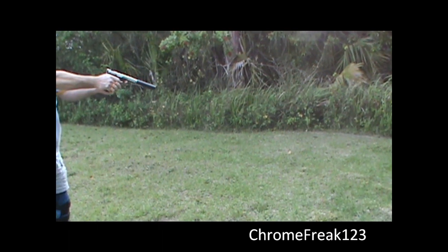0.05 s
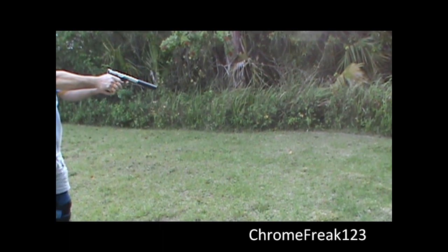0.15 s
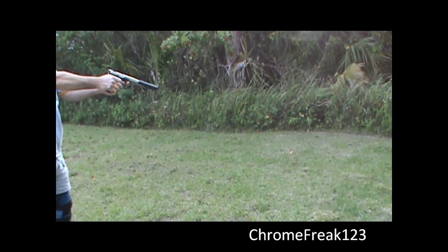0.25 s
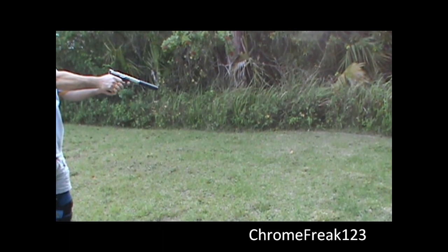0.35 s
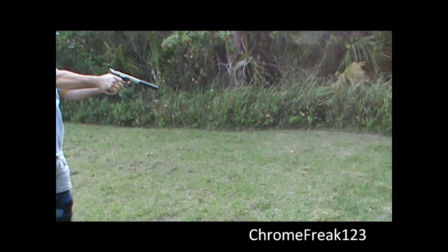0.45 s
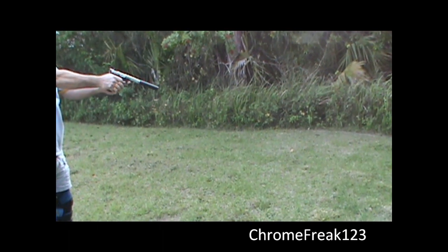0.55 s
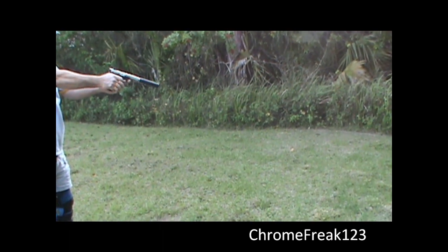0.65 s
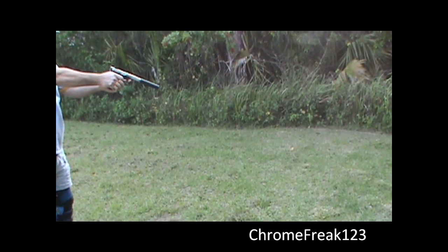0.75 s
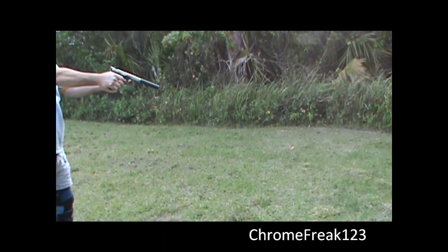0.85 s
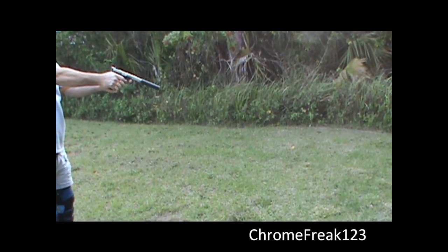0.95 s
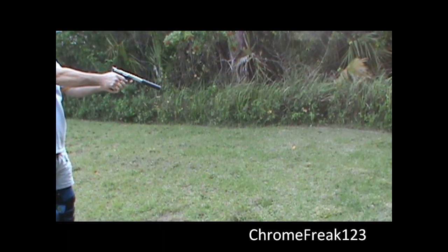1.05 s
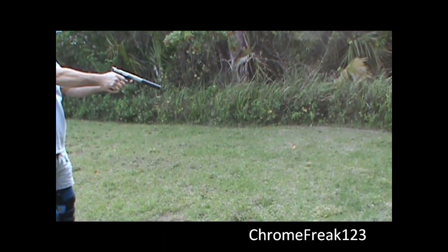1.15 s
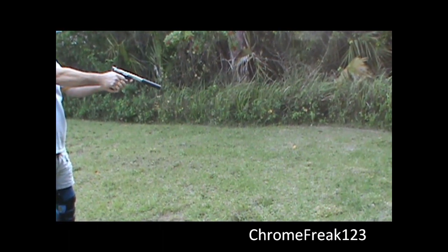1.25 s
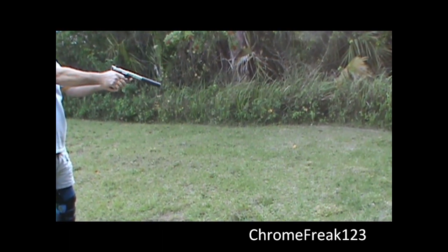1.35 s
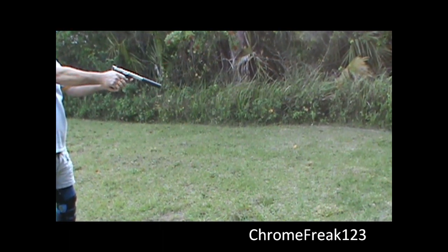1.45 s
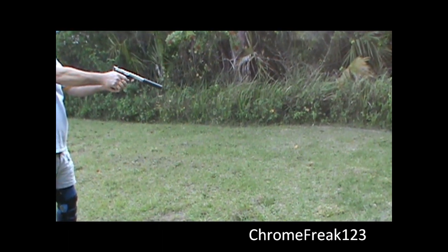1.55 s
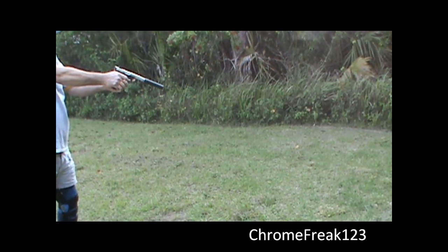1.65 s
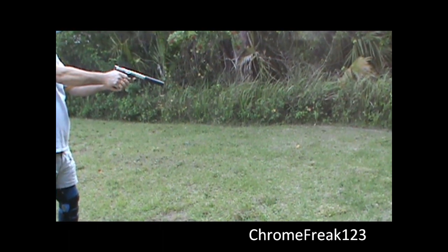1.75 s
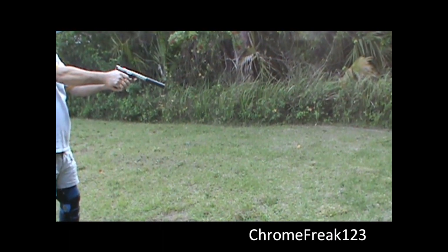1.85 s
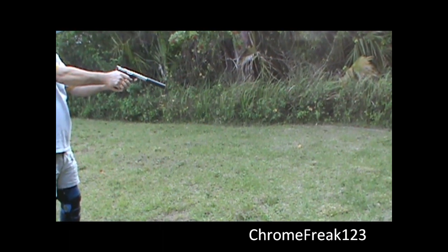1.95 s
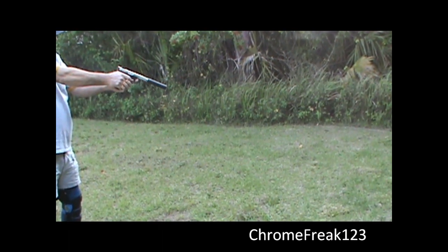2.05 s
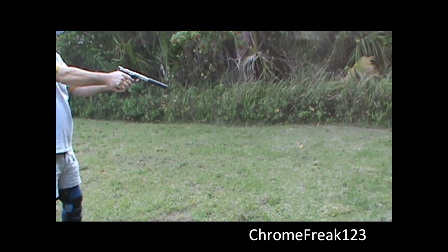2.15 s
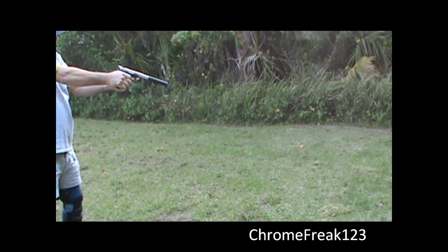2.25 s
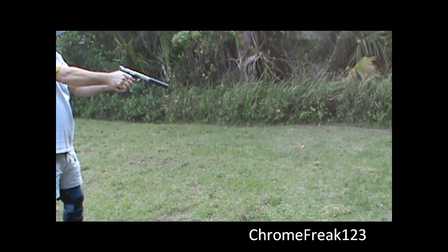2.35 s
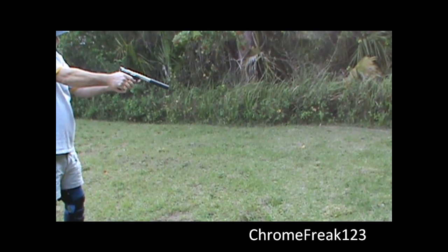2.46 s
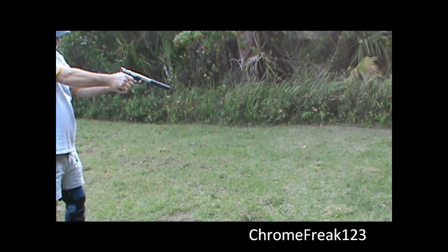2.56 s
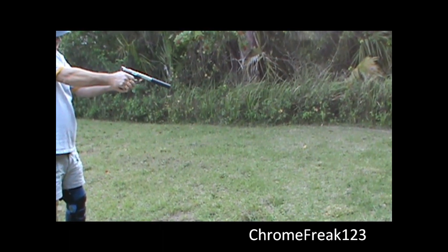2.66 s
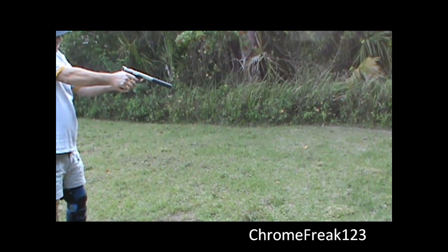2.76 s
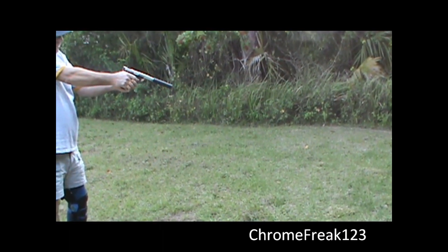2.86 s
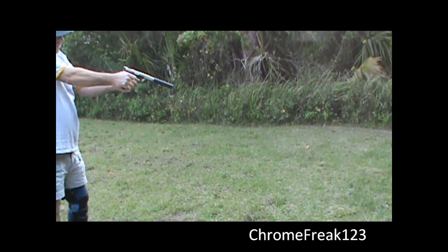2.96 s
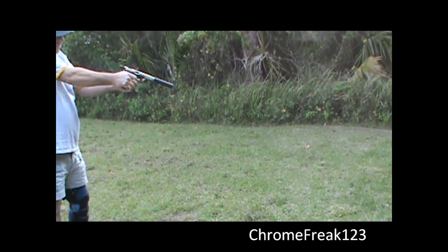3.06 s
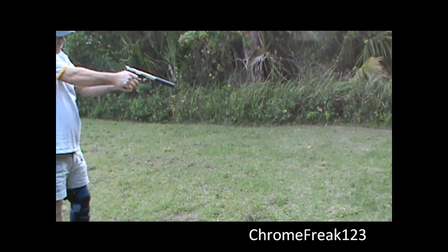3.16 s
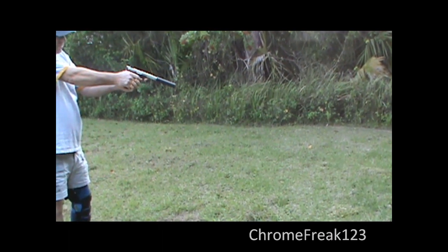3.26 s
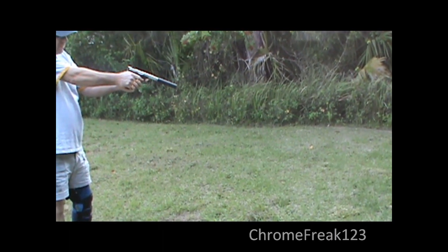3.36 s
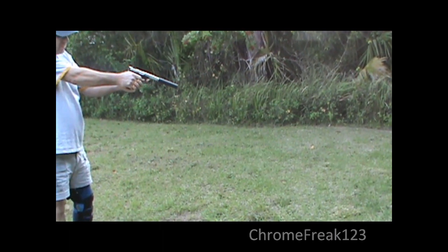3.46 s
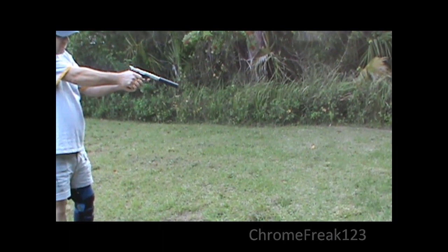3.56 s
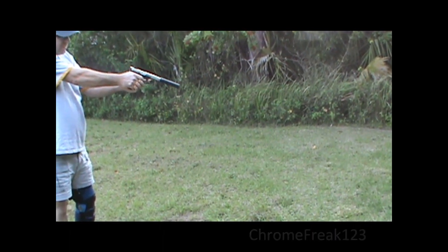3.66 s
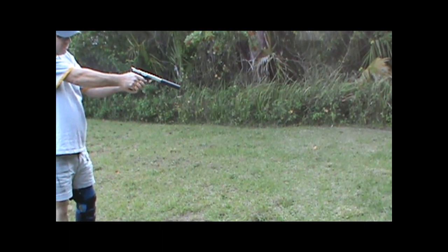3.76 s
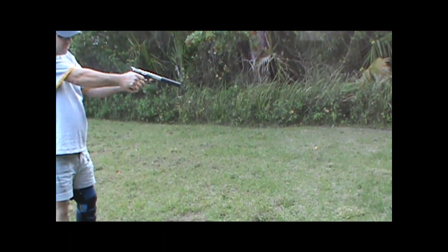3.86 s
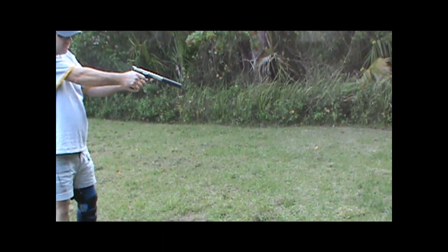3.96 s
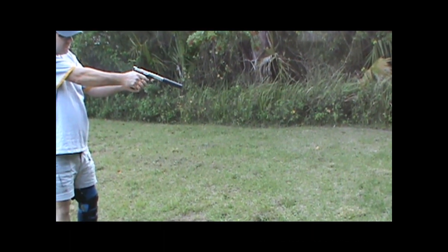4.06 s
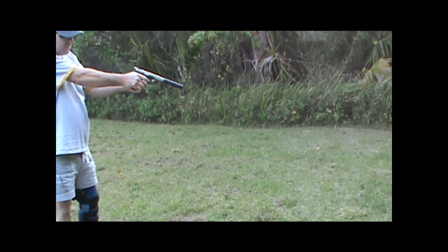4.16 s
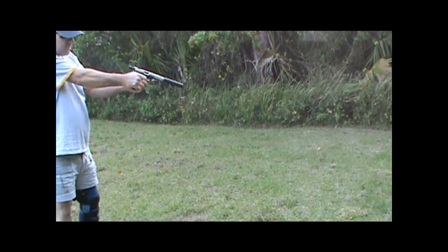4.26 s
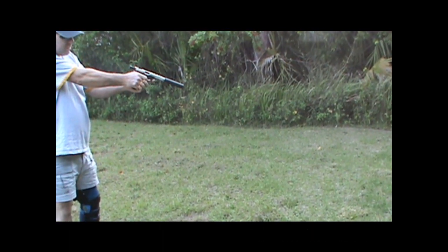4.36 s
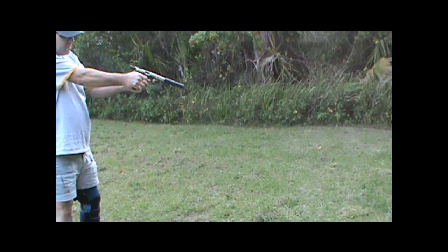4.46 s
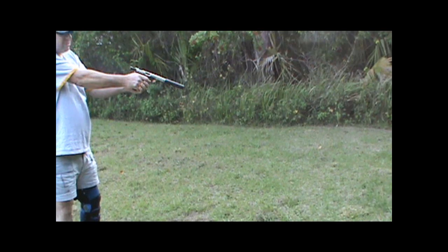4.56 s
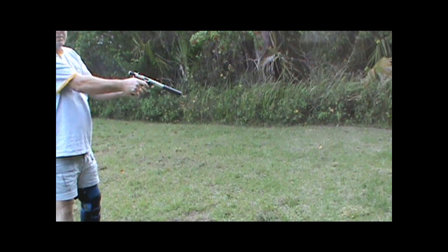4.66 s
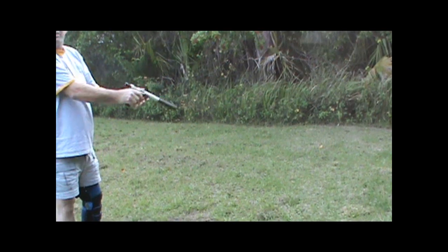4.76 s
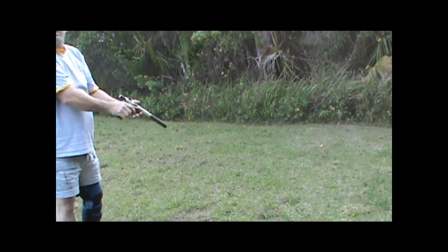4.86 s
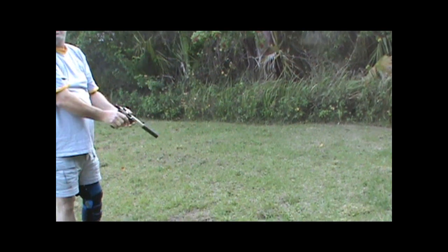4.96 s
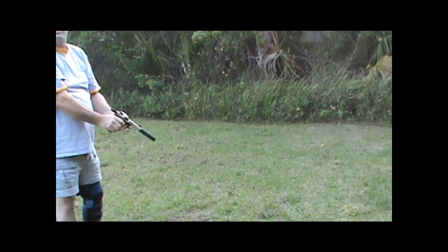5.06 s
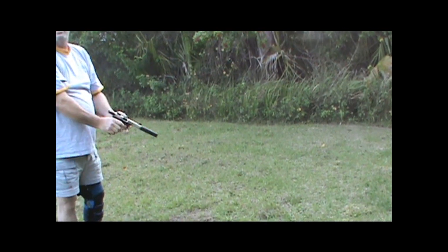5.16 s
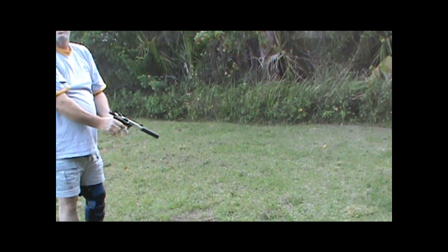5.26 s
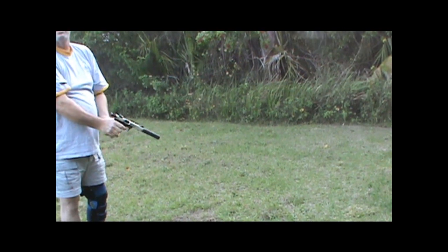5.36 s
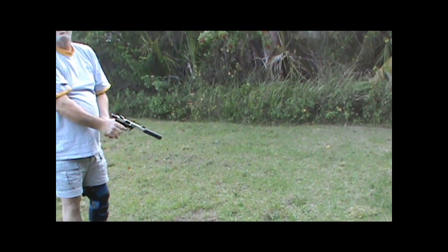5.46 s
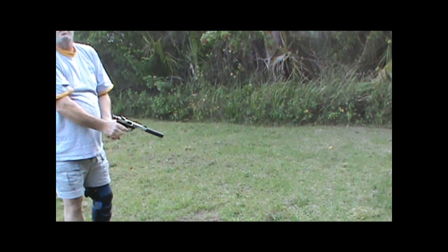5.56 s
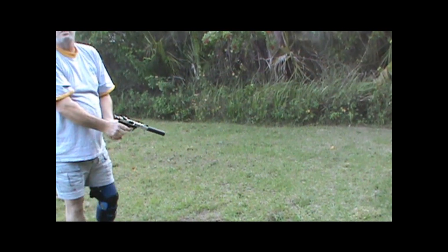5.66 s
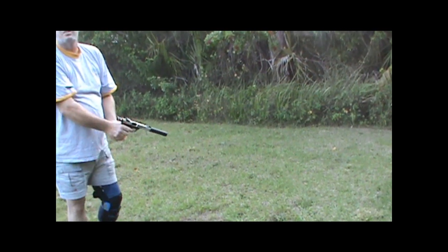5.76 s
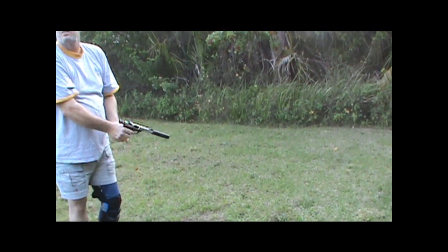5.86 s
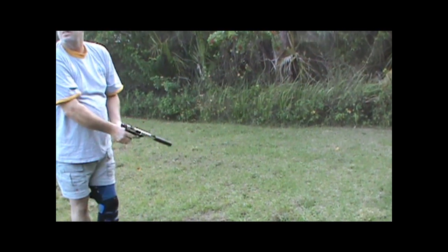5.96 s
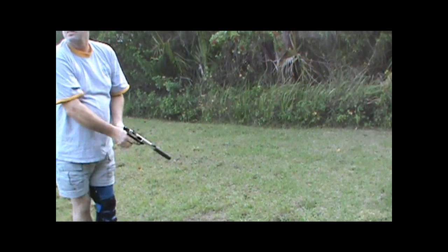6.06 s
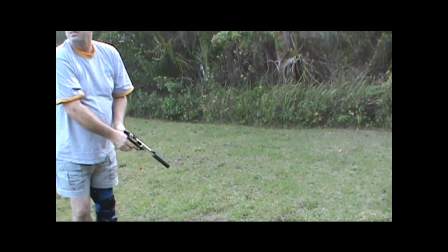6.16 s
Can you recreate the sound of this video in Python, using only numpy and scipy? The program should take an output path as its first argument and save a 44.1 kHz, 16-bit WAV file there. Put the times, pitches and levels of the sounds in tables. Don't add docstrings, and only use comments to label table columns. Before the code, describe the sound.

Outdoors, a suppressed pistol clicks, then fires nine dry spitting shots with turf thuds and short hissy reflections, over faint leaves, cricket and distant traffic.

```python
import sys
import numpy as np
from scipy import signal
from scipy.fft import rfft, irfft
from scipy.io import wavfile
from scipy.ndimage import uniform_filter1d, map_coordinates

SR = 44100
rng = np.random.default_rng(int(sys.argv[2]) if len(sys.argv) > 2 else 0)


def volts(x):
    e = np.asarray(x, float) / 20
    return 10 ** e


def wav_out(sig):
    wavfile.write(sys.argv[1], SR, np.round(np.clip(np.atleast_2d(sig).T, -1, 1) * 32767).astype(np.int16))


N = 273458

# (frequency [Hz], density [dB/Hz])
TRAFFIC_SPECTRUM = [(12, -48), (20, -19), (70, -3.5), (109, -4), (131, -2.5), (204, -5.5), (306, -10),
                    (338, -6.5), (382, -9), (477, -5), (528, -3.5), (714, -3), (1070, -13.5), (2500, -41),
                    (3250, -52), (5500, -120)]
# (time [s], level [dB])
TRAFFIC_LEVEL = [(0, -50), (.9, -50), (2.3, -52.5), (3.5, -50.5), (4.0, -52), (4.6, -50.5), (6.2, -51)]
# (time [s], length [s], lower tone level [dB], upper tone level [dB])
ENGINE_SWELLS = [(0, 0.13, -53.5, -57), (0.276, 0.18, -62, -53.5), (2.55, 0.22, -67, -61),
                 (3.416, 0.45, -55, -63), (4.5, 0.46, -59.5, -59)]
ENGINE_FADE_DB_PER_S, ENGINE_IDLE_DB = 90, -73
# (frequency [Hz], density [dB/Hz])
LEAF_SPECTRUM = [(710, -28), (1200, 2), (1400, -4.5), (1700, -1), (3740, -7), (6300, -4.5), (8170, -16),
                 (8910, -14.5), (16000, -28)]
# (time [s], level [dB])
LEAF_LEVEL = [(0, -54.5), (.9, -52), (1.2, -59.5), (1.7, -53), (2.4, -56.5), (3.2, -56.5), (4.2, -57.5),
              (4.8, -59.5), (5.7, -62.5), (6.1, -56)]
# (frequency [Hz], density [dB/Hz])
COTTON_SPECTRUM = [(1760, -42), (3000, -7), (4200, -8), (4600, -9), (5840, 3), (6300, -7), (6810, -4),
                   (14400, -4.5), (16000, -10)]
SLEEVE_S, SLEEVE_HOLD_S, SLEEVE_DB = 5.9, 0.12, -57.5
SLEEVE_RISE_DB_PER_S, SLEEVE_FALL_DB_PER_S = 70, 75
# (frequency [Hz], density [dB/Hz])
HISS_SPECTRUM = [(710, -19), (1200, -18), (2510, -12), (5350, -10), (6160, -8), (8720, -8.5), (16000, -6)]
# (frequency [Hz], left-right likeness [1])
BACKGROUND_LIKENESS = [(60, 1), (150, 0.94), (380, 0.88), (950, 0.71), (2380, 0.14), (5980, 0.39),
                       (15000, 0.69)]
# (time [s], level [dB])
CRICKET_LEVEL = [(0, -76), (.5, -72), (1.3, -72.5), (3, -82), (4.6, -74), (5.5, -70), (6.2, -76)]
HIGH_NOTES = [.38, 4.917, 5.353, 5.453, 5.654]
RESTS = [4.82, 5.153, 5.187, 5.32, 5.72, 5.754, 5.787]
# (time [s], level [dB], main ring frequency [Hz], length [ms])
CLICKS = [(0.136, -48, 6160, 5), (.196, -52, 5000, 2), (.25, -54, 2800, 2.7), (0.279, -58, 1690, 12),
          (.414, -59, 6400, 3), (.46, -53, 4500, 2), (2.229, -51.5, 6300, 2), (2.667, -50, 5500, 1.8),
          (3.553, -61, 6100, 2), (3.574, -47, 5500, 1.2), (3.579, -60, 6200, 1.2), (3.583, -51, 3120, 3.4),
          (3.583, -52, 5800, 2), (3.931, -51, 5500, 2), (4.322, -52, 5200, 2), (4.662, -53, 3100, 2),
          (4.677, -41.5, 5490, 1.5), (4.679, -43.5, 3500, 2.8), (4.681, -46, 5190, 1.8),
          (4.856, -59, 5600, 2), (5.111, -53, 6140, 6.6), (5.125, -55, 6200, 4.7), (5.215, -51, 6100, 3.3),
          (5.655, -53, 4400, 1.5), (5.6638, -40, 4170, 1.36), (5.664, -52, 3080, 2), (6.169, -59, 5600, 2)]
CLICK_WIDTH = 0.22
UNDER_RING, UNDER_DB = 0.477, -11
PIN_HZ, PIN_DB = 9900, -9.5

# (time [s], gas level [dB], wash level [dB], wash brightness above 10 kHz [dB])
SHOTS = [(0.74, -2, 2.5, -0.5), (1.4095, -2.5, 1.5, -0.5), (1.8544, -2, 1.5, -0.5), (2.3386, -2.5, 2, -1.5),
         (2.6955, -2, 2, -3), (3.1818, -3, 1, 0), (3.6063, -1, 2, -0.5), (3.9554, -2.5, 2, -0.5),
         (4.3433, -1, 1, 0)]
# (frequency [Hz], lift [dB], frequency [Hz], lift [dB])
PUFFS = [(3500, 3, 9100, 2), (4400, 2.5, 10600, 1.5), (5550, 1, 9900, 1), (3020, 1, 11800, 3),
         (5950, 3.5, 9600, 1.5), (6800, 1.8, 12500, 2.2), (6200, 1.1, 12700, 3), (7700, 1.5, 11900, 1),
         (5350, 1.5, 9600, 1.5)]
# (frequency [Hz], density [dB/Hz])
HEDGE_SPECTRUM = [(530, -43), (900, -7), (1110, -21), (1480, -15), (2140, -7.5), (2500, -7.5), (3310, -3.5),
                  (3970, -7), (5520, -1), (8150, -2.5), (10600, -3.5), (15700, -5.5), (16500, -46)]
# (frequency [Hz], slope [dB/s])
WASH_FADING = [(1000, 54), (3000, 8.5), (6000, 2), (10000, -10.5), (15000, -99)]
# (frequency [Hz], left-right level [dB])
PORT_BALANCE = [(200, -2), (600, -4.5), (1500, 1), (3000, 3), (6000, -4), (8000, 0), (11000, 6.5),
                (15000, 0.5)]
# (frequency [Hz], left-right likeness [1])
WASH_LIKENESS = [(60, 0.93), (180, 1), (550, 0.71), (1650, 0.16), (4970, 0.28), (15000, 0.72)]
FIRST_S, PEAK_S, RISE_DB_PER_S = 0.0016, 0.041, 465
HEDGE_END_S, HEDGE_FADE_DB_PER_S = 0.066, 696
TREES_DB, TREES_END_S, TREES_FADE_DB_PER_S = -5.5, 0.12, 145.5

# (time after shot [ms], length [ms], frame level [dB], slide level [dB], tube level [dB])
ACTION = [
    (-3.4, 1.1, -36, -39, -45),
    (1.3, 1.3, -31, -27.5, -23),
    (3.5, 1.3, -22, -23.5, -27.5),
    (7.8, 2.1, -29, -33, -23),
    (11.5, 2.5, -35, -41, -38),
]
# (frequency [Hz], bandwidth [Hz], left-right level [dB])
PARTS = [
    (2780, 2370, 6),
    (5700, 1000, -1),
    (10700, 4200, 8),
]
# (time after shot [ms], frequency [Hz], level [dB], length [ms], left-right level [dB])
WALLS = [(74.7, 2700, -19.5, 1, 0), (74, 6000, -24, 1, -4), (75.8, 6000, -23, 1, -4),
         (79.2, 7000, -26, 1, 0), (95.6, 6500, -24.5, .7, -2), (112, 3000, -30, 2.5, 5),
         (118, 5000, -28, 3, 3)]
WALL_WIDTH = 0.62
# (time after shot [ms], level [dB], left-right level [dB])
POPS = [(2, -33, 3), (4.3, -28, 0), (38.5, -37, -8), (52, -26, 0), (60, -29.5, -3), (68.8, -31, -3),
        (71.5, -31, -5)]
# (time after shot [ms], pop level [dB], boom level [dB])
THICK_TRUNKS = [(46.5, -44, -41), (82.5, -36, -45), (102.5, -32, -43), (109, -35, -39), (116, -33, -40),
                (147, -37, -46)]
POP_HZ, BOOM_HZ, BOOM_DB = 657, 257, -38
THIN_FROM_MS, THIN_TO_MS, THIN_EVERY_MS, THIN_SCATTER_MS = 77, 185, 9.5, 1.5
RETURN_DB, RETURN_LOSS_DB_PER_MS, RETURN_PAN_DB = -27.5, 0.2, -4.5
# (time [s], crack level [dB], thud level [dB], deep afterthud level [dB])
STRIKES = [(0.7561, -22, -37.5, -57), (1.4251, -15, -37, -55), (1.8701, -16, -39.5, -49),
           (2.3543, -14, -42.5, -43), (2.711, -16, -36, -45), (3.1984, -15, -39, -47),
           (3.6226, -10.5, -38.5, -62), (3.9724, -8.5, -35.5, -41), (4.3603, -12, -35, -40)]
THUD_HZ = 350
CASE_S, CASE_HZ, CASE_DB = 0.169, 12800, -43
SLIDE_S, SLIDE_DB = 0.0244, -25
# (frequency [Hz], gain [dB])
BAND_LIMIT = [(15800, 0), (15980, -38), (16750, -42), (16900, -90)]


def unit(x):
    return x / np.sqrt(np.mean(x ** 2) + 1e-20)


def along(points, hz):
    f, v = np.transpose(points)
    return np.interp(np.log(hz + 1), np.log(f + 1), v)


def curves(rows):
    s, *cols = np.transpose(rows)
    return [np.interp(np.arange(N) / SR, s, c) for c in cols]


def wobble(rate, size=N):
    knots = rng.standard_normal(int(size * rate / SR) + 4)
    return map_coordinates(knots, [np.arange(size) * rate / SR])


def swelling(t, start, hold, rise_db, fall_db):
    before = np.clip(start - t, 0, None)
    after = np.clip(t - start - hold, 0, None)
    return -rise_db * before - fall_db * after


def coloured(x, db_at):
    return irfft(rfft(x) * volts(db_at(np.fft.rfftfreq(N, 1 / SR))), N)


def add(out, s, x, pan_db=0):
    part = out[:, round(s * SR):][:, :x.shape[-1]]
    part += (x * volts(np.array([[.5], [-.5]]) * pan_db))[:, :part.shape[1]]


def rush(spectrum, alike, patchy_db, slow, size=N, shape_db=lambda hz, t: 0):
    hz, t, z = signal.stft(rng.standard_normal((2, size)), SR, nperseg=256)
    field = uniform_filter1d(rng.standard_normal(z.shape[1:]), 3, 0)
    field = uniform_filter1d(field, max(int(slow), 1), 1)
    gain = unit(volts(along(spectrum, hz)[:, None] + patchy_db * unit(field)))
    gain = gain * volts(shape_db(hz[:, None], t))
    turn = np.arccos(np.clip(along(alike, hz), -1, 1))[:, None] / 2
    mid, side = z[0] * np.cos(turn), z[1] * np.sin(turn)
    return signal.istft(gain * np.array([mid + side, mid - side]), SR, nperseg=256)[1][:, :size]


def burst(hz, width_hz, ms, apart=1.0, sudden=8, blow=0.36):
    u = np.arange(SR // 40) / SR / (ms / 1000)
    puff = rng.standard_normal((3, len(u))) * (1 - np.exp(-sudden * u)) * np.exp(-u)
    puff[0, 4] += blow * np.linalg.norm(puff[0])
    band = signal.iirpeak(min(hz, 15000), hz / width_hz / 1.29, SR)
    x = puff[0] + apart * puff[1:]
    x = signal.lfilter(*band, signal.lfilter(*band, x))
    return x / np.sqrt(np.sum(x ** 2) / (2 * SR * ms / 1000))


def push(hz, turns):
    u = np.arange(SR // 40) / SR * hz
    return np.sin(2 * np.pi * u) * u * np.exp(-u / turns * 2) * 5 / turns


def hiss():
    return volts(-65.5) * rush(HISS_SPECTRUM, BACKGROUND_LIKENESS, patchy_db=2.5, slow=8)


def traffic():
    level_db = curves(TRAFFIC_LEVEL)[0] + 0.81 * wobble(6.6)
    noise = rush([(20, 0)], BACKGROUND_LIKENESS, patchy_db=1.0, slow=17)
    return volts(level_db) * unit(coloured(noise, lambda hz: along(TRAFFIC_SPECTRUM, hz)))


def wavering_tone(hz):
    level = volts(2.8 * wobble(18))
    return level * np.sin(2 * np.pi * np.cumsum(hz + 7 * wobble(12)) / SR)


def engine():
    t = np.arange(N) / SR
    levels = volts(ENGINE_IDLE_DB)
    for s, length, *dbs in ENGINE_SWELLS:
        swell_db = swelling(t, s, length, ENGINE_FADE_DB_PER_S, ENGINE_FADE_DB_PER_S)
        levels = levels + volts(np.array(dbs)[:, None] + swell_db)
    low, high = levels
    return low * wavering_tone(471) + high * wavering_tone(546)


def leaves():
    level_db = curves(LEAF_LEVEL)[0] - 4.0 + 0.15 * wobble(5.4)
    return volts(level_db) * rush(LEAF_SPECTRUM, BACKGROUND_LIKENESS, patchy_db=2.0, slow=8.9)


def sleeve():
    t = np.arange(N) / SR
    stroke_db = swelling(t, SLEEVE_S, SLEEVE_HOLD_S, SLEEVE_RISE_DB_PER_S, SLEEVE_FALL_DB_PER_S)
    level_db = SLEEVE_DB + stroke_db + 0.99 * wobble(15)
    return volts(level_db) * rush(COTTON_SPECTRUM, BACKGROUND_LIKENESS, patchy_db=2.0, slow=27)


def cricket():
    def beat_at(s):
        return (np.asarray(s) - 4.885) * 29.95 + .5

    beat = beat_at(np.arange(N) / SR)
    high = np.isin(np.floor(beat), np.floor(beat_at(HIGH_NOTES)))
    silent = np.isin(np.floor(beat), np.floor(beat_at(RESTS)))
    stroke = np.clip((beat % 1 - .5) / .58, -.5, .5)
    note = np.clip(1.6 * np.cos(np.pi * stroke), 0, 1) * ~silent * np.where(high, .65, 1)
    tone = np.sin(2 * np.pi * np.cumsum(np.where(high, 6700, 6220)) / SR)
    level_db = curves(CRICKET_LEVEL)[0] + 5 + 1.8 * wobble(24)
    return volts(level_db) * note * tone * volts([[-2], [2]])


def grass():
    out = np.zeros((2, N))
    for when, pitch, strength in rng.random((26, 3)):
        tick = burst(2600 + 2800 * pitch ** .5, 1800, 1.3)
        add(out, 4.85 + 0.87 * when, volts(-65.5 + 4 * strength) * tick, 1.5)
    shift = volts(curves([(4.8, -86), (4.95, -68), (5.2, -67.5), (5.4, -92)])[0])
    rustle_spectrum = [(1200, -26), (2000, 3), (3800, -14), (6000, -19)]
    return out + shift * rush(rustle_spectrum, BACKGROUND_LIKENESS, patchy_db=3.5, slow=6.6)


def handling():
    out = np.zeros((2, N))
    for s, db, hz, ms in CLICKS:
        modes = [(hz, 0, ms), (UNDER_RING * hz, UNDER_DB, 1.8 * ms), (PIN_HZ, PIN_DB, .9 * ms)]
        for ring_hz, ring_db, length in modes:
            ring = burst(ring_hz, CLICK_WIDTH * ring_hz, length, sudden=15, blow=1.1)
            add(out, s, volts(db + ring_db) * ring, 1.5)
    return out


def wash_bass(swell, t):
    spectrum = [(50, -19), (110, -12), (200, -9), (350, -4), (600, 4.5), (900, -2.0), (1500, -5), (2500, -20.5)]
    late = swell * np.clip((t - .034) / 0.03, 0, 1)
    return late * rush(spectrum, WASH_LIKENESS, patchy_db=-2.0, slow=1.5, size=len(t),
                       shape_db=lambda hz, t: 30 * t)


def wash_treble(bright_db, puff):
    def shape_db(hz, t):
        bands_db = bright_db * (hz > 10000)
        for at_hz, lift_db in (puff[:2], puff[2:]):
            bands_db = bands_db + 1.76 * lift_db * np.exp(-((hz - at_hz) / 400) ** 2)
        early_db = -6 * np.exp(-((hz - 7600) / 900) ** 2 - t / 0.059)
        early_db = early_db - 3 * np.exp(-((hz - 2800) / 1500) ** 2 - (t / 0.12) ** 4)
        return along(WASH_FADING, hz) * t + (0.95 + 2.0 * t) * bands_db + early_db

    return rush(HEDGE_SPECTRUM, WASH_LIKENESS, patchy_db=2.0, slow=14, size=SR // 2, shape_db=shape_db)


def reflector_grain(size):
    spikes = uniform_filter1d(rng.random(size) * (rng.random(size) < .015), size=12)
    return volts(1.2 * wobble(600, size) + 1.1 * wobble(90, size)) + .14 * unit(spikes)


def hedge():
    out, size = np.zeros((2, N)), SR // 2
    t = np.arange(size) / SR
    near_db = swelling(t, PEAK_S, HEDGE_END_S - PEAK_S, RISE_DB_PER_S, HEDGE_FADE_DB_PER_S)
    far_db = TREES_DB + swelling(t, PEAK_S, TREES_END_S - PEAK_S, RISE_DB_PER_S, TREES_FADE_DB_PER_S)
    swell = np.hypot(volts(near_db), volts(far_db)) * np.clip(t / FIRST_S, 0, 1) ** 2
    bass = wash_bass(swell, t)
    for (s, _, db, bright_db), puff in zip(SHOTS, PUFFS):
        treble = swell * reflector_grain(size) * wash_treble(bright_db, puff)
        add(out, s, volts(db - 26) * treble + volts(-39) * bass)
    return coloured(out, lambda hz: np.outer([.5, -.5], along(PORT_BALANCE, hz)))


def pops_and_booms():
    out = np.zeros((2, N))
    thin_ms = np.arange(THIN_FROM_MS, THIN_TO_MS, THIN_EVERY_MS)
    thin_ms = thin_ms + rng.normal(0, THIN_SCATTER_MS, len(thin_ms))
    pops = [tuple(row) for row in POPS]
    pops += [(ms, db, RETURN_PAN_DB) for ms, db, _ in THICK_TRUNKS]
    pops += [(ms, RETURN_DB - RETURN_LOSS_DB_PER_MS * ms, RETURN_PAN_DB) for ms in thin_ms]
    booms = [(1.5, BOOM_DB)] + [(ms, db) for ms, _, db in THICK_TRUNKS]
    for s, *_ in SHOTS:
        for ms, db, pan_db in pops:
            pop = push(POP_HZ, turns=0.84 if ms < 10 else 1.25)
            add(out, s + ms / 1000, volts(db + rng.normal(0, 1)) * pop, pan_db)
        for ms, db in booms:
            add(out, s + ms / 1000, volts(db) * push(BOOM_HZ, turns=1.1))
    return out


def turf_strikes():
    out = np.zeros((2, N))
    for s, crack_db, thud_db, deep_db in STRIKES:
        crack = burst(1800, 3700, 1.0, sudden=41)
        crack = crack + 0.47 * burst(5200, 3000, 0.52, sudden=28)
        crack = crack + burst(10000, 4000, 0.46, sudden=30)
        add(out, s + 0.00055, volts(crack_db - 12.0) * 0.79 * crack)
        add(out, s + 0.0017, volts(thud_db + 10.5) * push(THUD_HZ, turns=0.74))
        add(out, s + .005, -volts(deep_db) * push(150, turns=1.4))
    return out


def spent_cases():
    out = np.zeros((2, N))
    for s, *_ in SHOTS:
        tick = burst(CASE_HZ, 3500, 1.5, sudden=15, blow=1.1)
        add(out, s + CASE_S + rng.normal(0, .002), volts(CASE_DB + rng.normal(0, 2)) * tick, 1.5)
    return out


def slide_closing():
    out = np.zeros((2, N))
    for s, *_ in SHOTS[:-1]:
        clack = .45 * burst(2750, 2100, 2.5, sudden=30)
        clack = clack + burst(5200, 2500, 1.1, sudden=30)
        clack = clack + .9 * burst(10500, 5000, 2.4, sudden=30)
        add(out, s + SLIDE_S, volts(SLIDE_DB) * clack, 2.5)
    return out


def action_and_walls():
    out = np.zeros((2, N))
    blows = []
    for ms, length, *dbs in ACTION:
        for (hz, width_hz, pan_db), db in zip(PARTS, dbs):
            blows.append((ms, hz, width_hz, db, length, pan_db))
    for ms, hz, db, length, pan_db in WALLS:
        blows.append((ms, hz, WALL_WIDTH * hz, db, length, pan_db))
    for s, gas_db, *_ in SHOTS:
        for ms, hz, width_hz, db, length, pan_db in blows:
            at_s = s + (ms + rng.normal(0, 0.25)) / 1000
            level = volts(db + gas_db + rng.normal(0, 0.42))
            add(out, at_s, level * burst(hz, width_hz, length), pan_db)
    return out


def scene():
    background = hiss() + traffic() + engine() + leaves() + sleeve()
    pistol = pops_and_booms() + turf_strikes() + spent_cases() + slide_closing() + action_and_walls()
    return background + cricket() + grass() + handling() + hedge() + pistol


def top_cut(x):
    return signal.sosfilt(signal.butter(12, 17000, fs=SR, output="sos"), x)


def record(dry):
    mix = coloured(dry, lambda hz: along(BAND_LIMIT, hz))
    return top_cut(mix)


dry = scene()
out = record(dry)
wav_out(out)
```